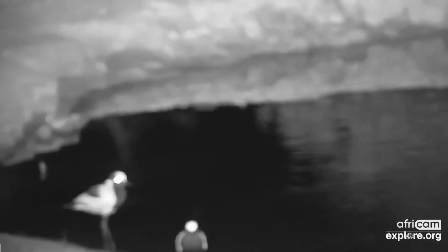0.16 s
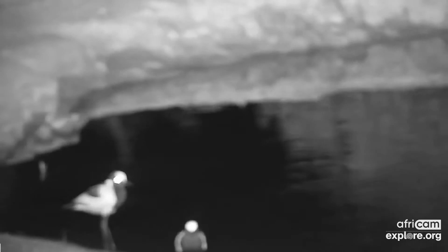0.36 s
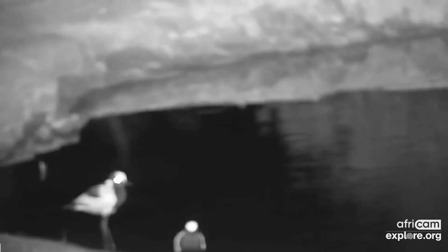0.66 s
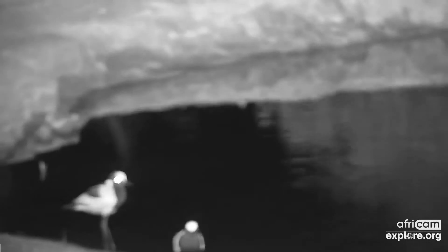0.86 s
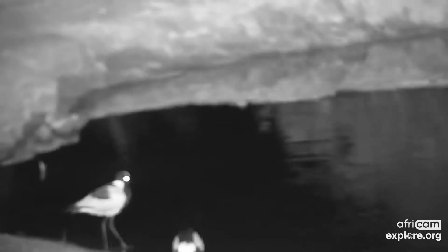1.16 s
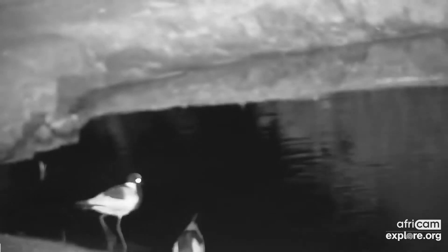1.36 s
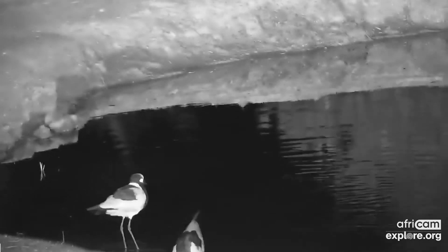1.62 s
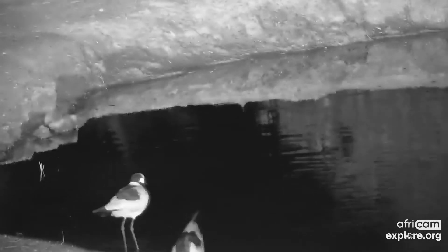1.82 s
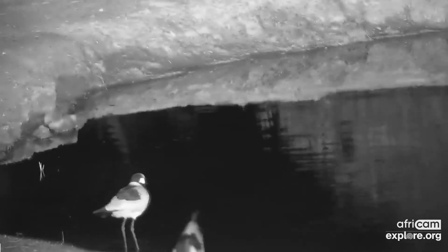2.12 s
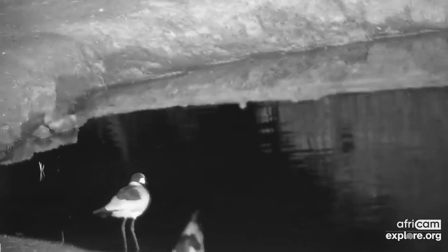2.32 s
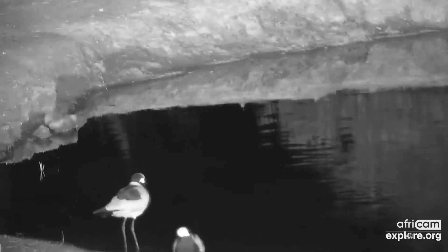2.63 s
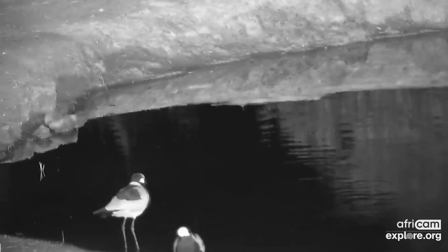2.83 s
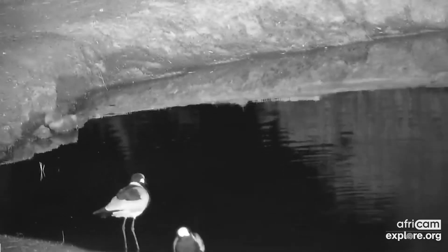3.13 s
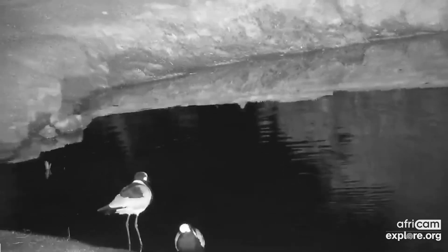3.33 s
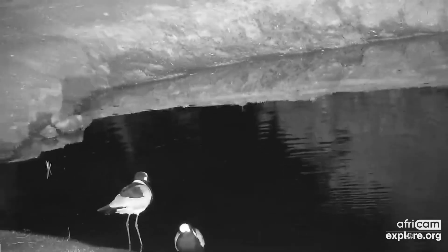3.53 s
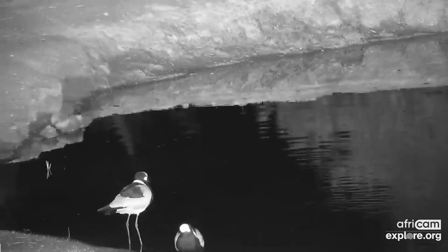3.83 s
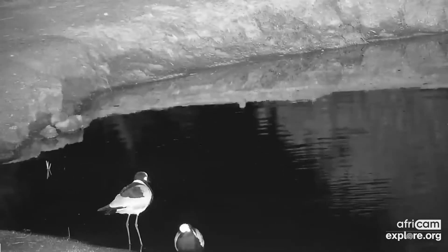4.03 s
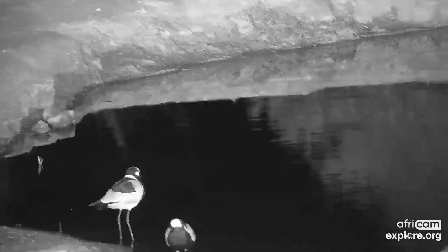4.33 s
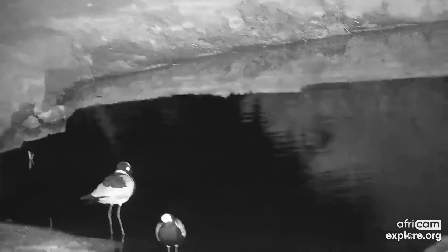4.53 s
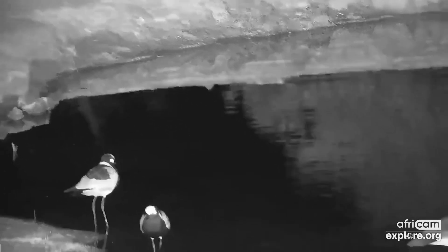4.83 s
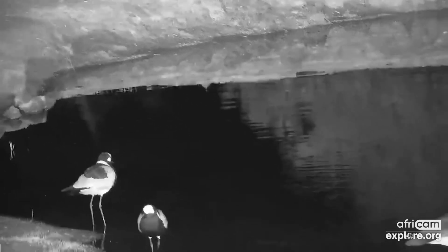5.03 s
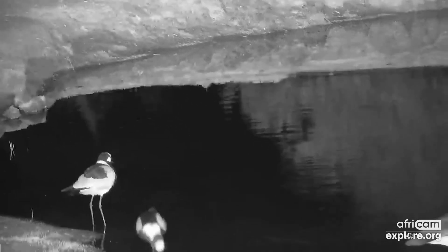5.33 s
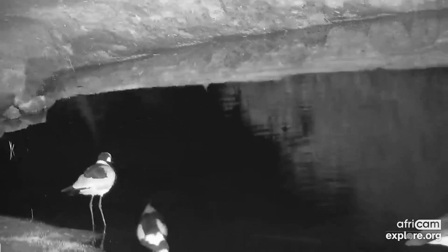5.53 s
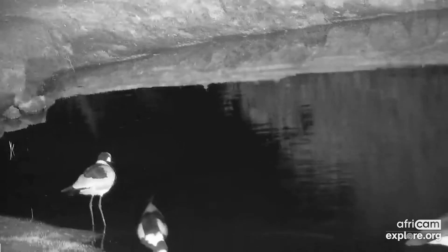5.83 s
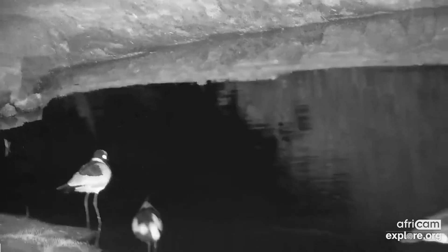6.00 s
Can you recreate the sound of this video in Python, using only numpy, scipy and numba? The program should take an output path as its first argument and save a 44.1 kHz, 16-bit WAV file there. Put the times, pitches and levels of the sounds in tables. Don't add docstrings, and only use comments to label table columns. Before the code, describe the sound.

A dense chorus of reed frogs creaks upward at night over bubbling frog pops, steady cricket trilling and rasping katydids, with a low rumble beneath.

```python
import sys
import numpy as np
from scipy import signal
from scipy.fft import rfft, irfft
from scipy.io import wavfile
from scipy.ndimage import uniform_filter1d
from numba import njit

SR = 44100
rng = np.random.default_rng(int(sys.argv[2]) if len(sys.argv) > 2 else 0)


def voltage_ratio(decibels):
    exponent = np.asarray(decibels, float) / 20
    return 10 ** exponent


def int16_out(signal):
    q = np.round(np.clip(np.atleast_2d(signal).T, -1, 1) * 32767)
    wavfile.write(sys.argv[1], SR, q.astype(np.int16))


N = 271656

# frequency in Hz, level in dB per Hz.
RUMBLE_SPECTRUM = [(15, -35.5), (26, -8), (50, -7), (75, 0.5), (106, -8.5), (162, -20), (236, -30),
                   (260, -60), (340, -55), (570, -120)]
# time in seconds, level in dB.
RUMBLE_LEVELS = [(0, -36.5), (.25, -37.5), (.75, -37.5), (1, -41), (1.75, -42), (3.25, -43), (4.25, -38.5),
                 (4.5, -39), (5, -41), (5.25, -44), (5.75, -40), (6.16, -41.5)]
# pitch in Hz, wander in Hz, level in dB against the rumble.
ENGINE_TONES = [(52.5, 7.01, -3.5), (68.9, 5.2, -3), (99.7, 7.98, -6.5), (121, 8.38, -12.5)]
# frequency in Hz, level in dB per Hz.
AIR_SPECTRUM = [(150, -7.5), (300, 0.5), (500, -2), (1000, -7), (1300, -3.5), (2200, -1), (3800, 1.5),
                (5600, -1), (6200, -5), (7000, -0.5), (8600, -12.5), (10000, -16), (11200, -24)]
# pitch in Hz, rms level in dB.
HUM_TONES = [(300, -70.5), (1599, -66), (2454, -75)]
# start in seconds, length in seconds, pitch in Hz, peak in dB, second harmonic in dB.
CATTLE_LOWS = [
    (-.06, .27, 345, -49, -57),
    (3.34, .26, 336, -59, -61),
    (4.18, .32, 266, -57, -78),
    (4.18, .2, 354, -55, -67),
    (4.42, .15, 352, -54, -62),
    (4.57, .52, 330, -57, -55),
    (5.95, .4, 332, -58, -57),
]
# start in seconds, end in seconds, rasps per second, peak in dB.
HIGH_RASPS = [
    (0.151, .68, 65, -62),
    (1.022, 1.5, 55, -59),
    (2.251, 2.62, 46, -57.5),
]
# start in seconds, length in seconds, start in Hz, end in Hz, peak in dB.
HIGH_SQUEALS = [
    (2.175, .05, 10800, 10400, -60),
    (2.21, .04, 9700, 10900, -62),
    (4.09, .06, 10900, 10600, -55),
]
# start in seconds, length in seconds, pitch in Hz, peak in dB.
TWIG_TICKS = [
    (1.9, .02, 9750, -76),
    (3.435, .03, 10100, -68),
    (4.33, .01, 9600, -72),
    (4.42, .01, 9600, -72),
]
# time in seconds, peak in dB.
NEAR_POPS = [(0.13, -49), (0.29, -55), (0.365, -53), (0.477, -51), (0.588, -47.5), (0.668, -52),
             (1.054, -51.0), (1.221, -43.5), (1.39, -52), (1.447, -51), (1.514, -48.5), (1.569, -54),
             (1.841, -50), (2.35, -57), (2.564, -47), (2.804, -53.5), (3.021, -49.5), (3.352, -51),
             (3.463, -53), (3.817, -56), (4.208, -51), (4.22, -45), (4.639, -52), (4.918, -53),
             (5.022, -47.5), (5.214, -51), (5.446, -49), (5.569, -48), (5.837, -54), (5.987, -49)]
FAINT_POP_TIMES = [1.739, 3.047, 3.155, 3.221, 3.3, 3.541, 3.928, 4.123, 5.303, 5.752, 6.08]
# from this time in seconds, strokes per second.
KATYDID_TEMPO = [(0, 37.64), (.75, 36.95), (1.75, 37.54), (2.44, 42.67), (2.56, 37.49), (3.25, 37.85),
                 (4.25, 36.96), (4.75, 37.82), (5.25, 37.16)]
# from and to, in seconds.
KATYDID_SILENCE = (2.445, 2.535)
# from this time in seconds, strokes per second.
GROUND_CRICKET_TEMPO = [(0, 90.55), (1, 90.88), (1.75, 91.44), (3, 91.22), (3.5, 92.1), (4.75, 91.12),
                        (5.5, 90.8)]
MISSED_STROKES = [3.098, 3.12]
# start in seconds, number of strokes, start in Hz, peak in dB.
CRICKET_TRILLS = [
    (.23, 3, 5000, -44),
    (1.258, 7, 4990, -36),
    (1.886, 2, 4560, -45),
    (2.688, 3, 4530, -44),
    (3.213, 7, 4990, -35.5),
    (3.68, 2, 4560, -43),
    (4.591, 2, 4530, -41),
    (4.928, 4, 5150, -42),
    (5.438, 6, 4660, -44),
]
# start in seconds, strokes, strokes per second, peak in dB.
CRICKET_SONGS = [
    (.02, 9, 27, -48),
    (1.0, 16, 27, -48),
    (2.42, 25, 27.7, -47),
    (4.1, 18, 31, -47),
    (5.95, 6, 30, -47),
]
# start in seconds, length in seconds, start in Hz, peak in dB.
CRICKET_SQUEAKS = [(3.318, .0155, 5600, -42), (3.42, .0345, 5790, -38.5), (3.487, .036, 5850, -39),
                   (3.619, .034, 5850, -39.5), (3.689, .036, 5850, -39.5), (3.843, .038, 5720, -41),
                   (3.908, .012, 5750, -42.5), (3.918, .039, 5844, -40), (3.955, .0126, 5910, -38),
                   (4.002, .0104, 6000, -38), (4.014, .014, 6030, -37), (4.037, .015, 6150, -39),
                   (4.432, .013, 5950, -43), (4.488, .012, 6040, -41), (4.551, .014, 6050, -38.5),
                   (4.569, .016, 6100, -38.5), (4.943, .012, 5700, -43.5), (4.999, .0115, 6000, -41),
                   (5.045, .0102, 6060, -43), (5.062, .0121, 5970, -40), (5.08, .015, 6050, -41),
                   (5.411, .017, 5980, -46.5), (5.459, .0158, 6050, -44), (5.503, .009, 5900, -44),
                   (5.514, .0103, 5900, -42), (5.526, .013, 6030, -40), (5.544, .018, 6150, -39)]
# time in seconds, drop of the frogs in dB, drop of the crickets in dB.
CROWD_HUSHES = [(0, 2, -1), (.33, 1.5, 1.5), (.5, 1.5, 2), (.78, 2.5, 2), (1.42, 8, 0.5), (1.55, 5, 2.5),
                (1.88, 1.5, 5), (2.12, 1, 0), (2.44, 3, 4), (2.6, 2, 7), (3.08, 3.5, 0), (3.24, 5.5, 0),
                (3.5, 2.5, 3.5), (3.74, 3, 4), (4.0, 3, 1), (4.25, -0.5, 4), (4.48, 2.5, -1), (5.0, 2.5, 0),
                (5.36, 2.5, 9), (5.63, 4, -2), (5.97, 2, 1)]
# start in seconds, length in seconds, start in Hz, peak in dB.
REED_FROG_CALLS = [(0.093, 0.09, 2874, -23), (0.102, 0.11, 2738, -25), (0.186, 0.08, 3250, -31),
                   (0.607, 0.076, 3100, -27), (0.815, 0.062, 2890, -25.5), (1.092, 0.11, 2800, -25),
                   (1.265, 0.068, 2786, -30), (1.486, 0.062, 3050, -26.5), (1.564, .08, 2765, -29),
                   (1.768, 0.052, 3150, -23), (2.125, 0.038, 2948, -22.5), (2.554, 0.055, 3030, -25),
                   (2.673, 0.045, 2754, -28.5), (2.898, 0.023, 3324, -22), (3.004, 0.042, 2755, -26),
                   (3.263, 0.051, 2780, -23.5), (3.278, 0.029, 3020, -22.5), (3.558, 0.057, 2960, -23),
                   (3.991, 0.029, 2945, -24), (4.038, 0.11, 2916, -25.5), (4.141, 0.042, 3160, -25),
                   (4.279, 0.019, 3230, -22), (4.732, 0.069, 2953, -24), (4.75, 0.025, 3328, -25),
                   (4.824, 0.044, 2980, -24.5), (5.027, 0.034, 2986, -22), (5.166, 0.027, 2980, -22),
                   (5.536, 0.074, 2888, -21), (5.778, 0.059, 3143, -23.5), (5.816, 0.068, 3040, -27.5)]

SNAP_S = 3.245


def level(x, db):
    return x * voltage_ratio(db) / np.sqrt(np.mean(x ** 2))


def smooth_noise(shape, first, second):
    return level(uniform_filter1d(uniform_filter1d(rng.standard_normal(shape), first), second), 0)


def coloured(points):
    hz, db = np.transpose(points)
    f = np.maximum(np.arange(N // 2 + 1) * SR / N, 1)
    gain = voltage_ratio(np.interp(np.log(f), np.log(hz), db, left=-60, right=-60))
    return irfft(rfft(rng.standard_normal(N)) * gain, N)


def patchy(x, depth_db):
    z = signal.stft(x, nperseg=512)[2]
    drift = uniform_filter1d(uniform_filter1d(rng.standard_normal(z.shape), size=9, axis=1), size=3, axis=0)
    return signal.istft(z * voltage_ratio(depth_db * level(drift, 0)), nperseg=512)[1][:N]


def distance(x, t60, wet_db):
    t = np.arange(int(.4 * SR)) / SR
    tail = rng.standard_normal(len(t)) * np.exp(-np.log(1000) * t / t60)
    tail = tail / np.sqrt(np.sum(tail ** 2))
    return x + voltage_ratio(wet_db) * signal.fftconvolve(x, tail)[:N]


@njit
def glides(s, length, hz0, hz1, size, phase, rise, flat):
    out = np.zeros(N)
    for k in range(len(s)):
        start, n, p = int(s[k] * SR), int(length[k] * SR), phase[k]
        for i in range(max(0, -start), min(n, N - start)):
            u = i / n
            p += 2 * np.pi * (hz0[k] + (hz1[k] - hz0[k]) * u) / SR
            w = u / rise if u < rise else (1 - u) / (1 - rise)
            out[start + i] += size[k] * np.sin(np.pi / 2 * w) ** flat * np.sin(p)
    return out


def chirps(s, length, hz0, hz1, db, rise=0.35, flat=2.04, scatter_db=0., scatter_hz=0.):
    s = np.asarray(s, float)
    chance = rng.standard_normal((len(s), 3)).T
    shift = scatter_hz * chance[1]
    length = length * np.ones(len(s))
    size = voltage_ratio(db + scatter_db * chance[0])
    return glides(s, length, hz0 + shift, hz1 + shift, size, 9 * chance[2], float(rise), float(flat))


def scattered(count):
    chance = rng.random((count, 3)).T
    s = (np.arange(count) + 3 * chance[0]) * (N / SR + .1) / count - .1
    return s, chance[1], chance[2]


def strokes(tempo, start):
    s, rate = np.transpose(tempo)
    s = np.append(s, N / SR)
    count = start + np.append(0, np.cumsum(rate * np.diff(s)))
    return np.interp(np.arange(1, count[-1]), count, s)


def rumble():
    out = level(coloured(RUMBLE_SPECTRUM), -2.0)
    for hz, wander_hz, db in ENGINE_TONES:
        drift = smooth_noise(N, 4000, 4000)
        out = out + voltage_ratio(db) * np.sin(2 * np.pi * np.cumsum(hz + wander_hz * drift) / SR)
    s, db = np.transpose(RUMBLE_LEVELS)
    loudness = voltage_ratio(np.interp(np.arange(N) / SR, s, db))
    return loudness * signal.sosfilt(signal.butter(4, 40, "high", fs=SR, output="sos"), out)


def air_and_hum():
    hum = sum(voltage_ratio(db + 2) * np.sin(2 * np.pi * hz * np.arange(N) / SR) for hz, db in HUM_TONES)
    return level(patchy(coloured(AIR_SPECTRUM), 3.86), -49) + hum


def cattle():
    attack_s, release_s, fade_db, climb_hz_per_s, waver_hz = .05, .022, 12, 50, 6
    out = 0
    for s, length, hz, db, second_db in CATTLE_LOWS:
        t = np.arange(N) / SR - s
        swell = np.clip(np.minimum(t / attack_s, (length - t) / release_s), 0, 1)
        swell = swell * voltage_ratio(-fade_db * np.clip((t - attack_s) / length, 0, 1))
        pitch = hz + climb_hz_per_s * t + waver_hz * smooth_noise(N, 1500, 1500)
        phase = 2 * np.pi * np.cumsum(pitch) / SR
        out = out + swell * (voltage_ratio(db) * np.sin(phase) + voltage_ratio(second_db) * np.sin(2 * phase))
    return distance(out, .2, -10)


def far_toads():
    s = np.arange(-.05, N / SR, 1 / 21)
    s = s + .012 * rng.standard_normal(len(s))
    hoots = chirps(s, .07, 690, 696, 0, scatter_db=2.5, scatter_hz=7)
    return level(distance(hoots, 0.42, -8.5), -62)


def twig_snap():
    t = np.arange(N) / SR - SNAP_S
    burst = rng.standard_normal(N) * (np.exp(-(t / .0005) ** 2) + .03 * np.exp(-(t / .018) ** 2))
    return voltage_ratio(-43) * signal.sosfilt(signal.butter(6, [5000, 14000], "band", fs=SR, output="sos"), burst)


def high_voices():
    out = 0
    for start, end, rate, db in HIGH_RASPS:
        s = np.arange(start, end, 1 / rate)
        out = out + chirps(s, 0.0025, 12000, 9300, db, scatter_db=4.5, scatter_hz=500)
    part = np.linspace(0, 1, num=12)
    for s, length, hz0, hz1, db in HIGH_SQUEALS:
        hz = hz0 + (hz1 - hz0) * part
        out = out + chirps(s + length * part, .008, hz, hz, db, scatter_db=2, scatter_hz=220)
    for s, length, hz, db in TWIG_TICKS:
        out = out + chirps(s + length * part, .008, hz, hz, db, scatter_db=2, scatter_hz=650)
    return distance(out, 0.15, -1.1)


def bubbling_frogs():
    s, db = np.transpose(NEAR_POPS + [(s, -58) for s in FAINT_POP_TIMES])
    near = chirps(s - .003, .04, 1100, 1650, db - 1, rise=.3, flat=.9, scatter_hz=25)
    s, pitch, size = scattered(count=160)
    far = chirps(s, 0.0455, 1150 + 250 * pitch, 1600 + 200 * pitch, -62 - 8 * size, flat=0.4)
    s, pitch, size = scattered(count=170)
    peepers = chirps(s, .03, 1950 + 450 * pitch, 2150 + 450 * pitch, -61 - 10 * size, flat=1.5)
    return distance(near, 0.17, -4) + distance(far + peepers, 0.15, -3)


def katydids():
    first = strokes(KATYDID_TEMPO, start=.32)
    first = first[(first < KATYDID_SILENCE[0]) | (first > KATYDID_SILENCE[1])]
    second = np.arange(.012, N / SR, 1 / 38.8)
    out = 0
    for s, db in ((first, -42), (second, -51)):
        s = (s[:, None] + np.array([-.0056, -.0003, .005])).ravel()
        s = s + .0003 * rng.standard_normal(len(s)) - .0013
        out = out + chirps(s, 0.0046, 7730, 7300, db, rise=0.2, flat=1.2, scatter_db=1.2, scatter_hz=150)
        out = out + chirps(s + 0.0014, 0.0027, 6910, 7260, db - 0.5, scatter_hz=200)
    return distance(out, .04, -8)


def ground_cricket():
    s = strokes(GROUND_CRICKET_TEMPO, start=.1)
    s = s[np.abs(s[:, None] - MISSED_STROKES).min(axis=1) > .004]
    s = s + .0003 * rng.standard_normal(len(s)) - .0038
    wing = chirps(s, .0098, 1770, 1745, 0, rise=.42, flat=1.8, scatter_db=1.2, scatter_hz=11)
    return level(distance(wing, .05, -16), -45.5)


def grass_crickets(chorus_db):
    s, pitch, size = scattered(count=4500)
    top_hz = 4150 + 600 * (pitch + size) + 100 * rng.standard_normal(len(s))
    crowd = chirps(s, 0.0087 + 0.0045 * size, top_hz, top_hz - 350, 0, scatter_db=3.5, scatter_hz=178.4)
    near = 0
    for s, count, hz, db in CRICKET_TRILLS:
        near = near + chirps(s + np.arange(int(count)) / 58.6, 0.0171, hz, hz - 670, db, scatter_db=1.8)
    for s, count, rate, db in CRICKET_SONGS:
        near = near + chirps(s + np.arange(int(count)) / rate, 0.022, 5020, 4865, db, scatter_db=2.0)
    s, length, hz, db = np.transpose(CRICKET_SQUEAKS)
    fall_hz = np.minimum(49500 * length, 1025)
    squeaks = chirps(s, length, hz, hz - fall_hz, db, rise=0.5, flat=1.2)
    near = distance(near + voltage_ratio(1.5) * squeaks, .06, -10)
    return voltage_ratio(chorus_db) * level(distance(crowd, 0.32, 0.9), -1.97) + near


def crowd_levels():
    t = np.arange(N) / SR
    hush_s, warm_up_s = 0.052, 2.86
    drop = sum(np.outer(db, np.exp(-((t - s) / hush_s) ** 2 / 2)) for s, *db in CROWD_HUSHES)
    frogs_db = np.interp(t, [warm_up_s - .3, warm_up_s + .3], [-33, -32])
    return frogs_db - drop[0], -45.5 - drop[1]


def creak(s, length, hz0, hz1, db, pulse_s, bend_hz):
    part = np.arange(14) * pulse_s
    sounds = part < length[:, None]
    share = part / length[:, None]
    hz = (hz0[:, None] + (hz1 - hz0)[:, None] * share)[sounds]
    swell = np.sin(np.pi * np.clip(0.16 + 0.48 * share, 0, .95))
    swell_db = (db[:, None] + 10 * np.log10(swell))[sounds]
    start = (s[:, None] + part + .002 * rng.standard_normal(share.shape))[sounds]
    return chirps(start, 1.02 * pulse_s, hz - bend_hz, hz + bend_hz, swell_db,
                  rise=0.75, flat=0.34, scatter_db=2.5, scatter_hz=53.9)


def reed_frogs(chorus_db):
    s, length, hz, db = np.transpose(REED_FROG_CALLS)
    climb_hz = 4100 * length
    near = creak(s, length, hz, hz + climb_hz, db, pulse_s=.011, bend_hz=121.0)
    s, pitch, size = scattered(count=1000)
    low_hz = 2620 + 560 * pitch
    high_hz = low_hz + 250 + 150 * size
    crowd_db = 2.6 * rng.standard_normal(len(s))
    crowd = creak(s, .03 + .04 * size, low_hz, high_hz, crowd_db, pulse_s=.009, bend_hz=106)
    crowd = level(distance(crowd, 0.37, -7.5), -0.22)
    flutter_db = 8 * np.minimum(smooth_noise(N, 160, 120) + .3, 0)
    chorus = distance(voltage_ratio(-6.5) * near, 0.071, -6) + voltage_ratio(chorus_db + flutter_db) * crowd
    return signal.sosfilt(signal.butter(6, [2600, 3580], "band", fs=SR, output="sos"), chorus)


def scene():
    frogs_db, crickets_db = crowd_levels()
    background = rumble() + air_and_hum() + cattle() + far_toads() + twig_snap()
    insects = high_voices() + katydids() + ground_cricket() + grass_crickets(crickets_db)
    frogs = bubbling_frogs() + reed_frogs(frogs_db)
    return (background + insects + frogs)[None]


def roll_off(x):
    return signal.sosfilt(signal.butter(12, 15000, fs=SR, output="sos"), x)


def record(dry):
    cut = signal.sosfilt(signal.ellip(6, .2, 60, 11050, fs=SR, output="sos"), dry)
    cut = signal.sosfilt(signal.ellip(8, .2, 70, 11080, fs=SR, output="sos"), cut)
    top = signal.sosfilt(signal.ellip(8, .2, 80, 11100, "high", fs=SR, output="sos"), dry)
    opened = np.exp(-((np.arange(N) / SR - SNAP_S) / .03) ** 4)
    return roll_off(cut + opened * top)


dry = scene()
out = record(dry)
int16_out(out)
```